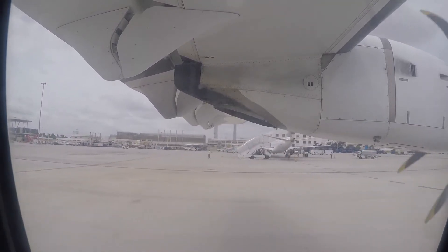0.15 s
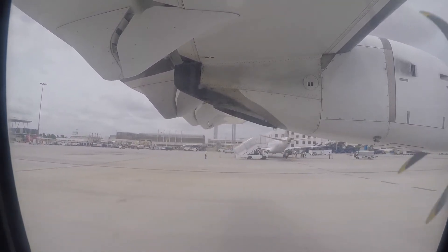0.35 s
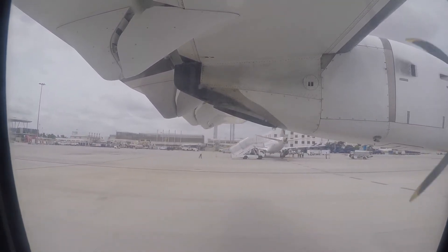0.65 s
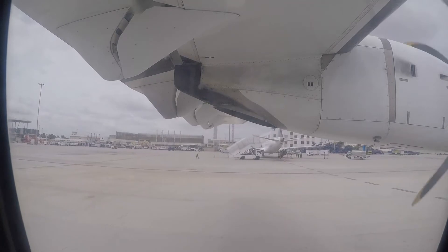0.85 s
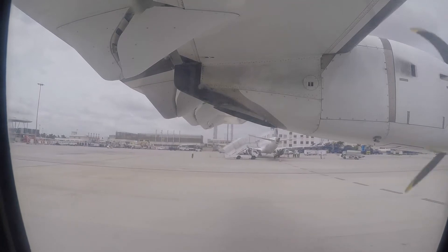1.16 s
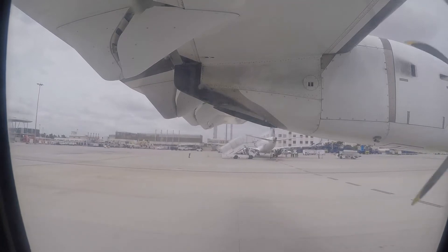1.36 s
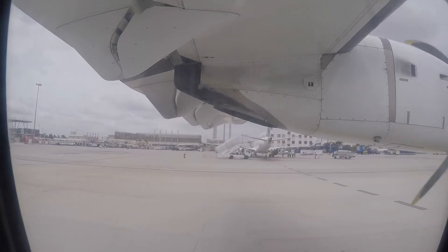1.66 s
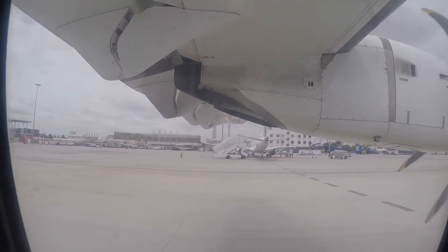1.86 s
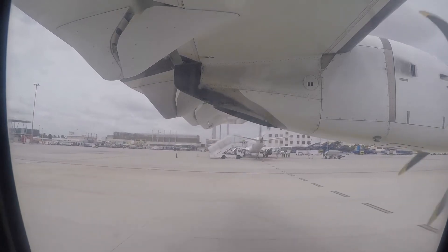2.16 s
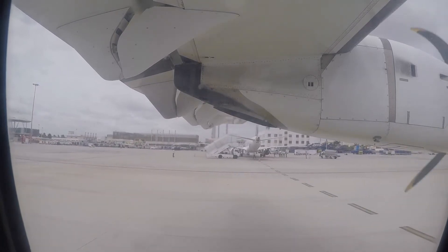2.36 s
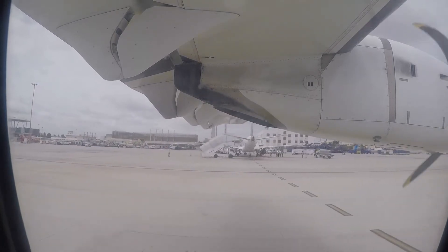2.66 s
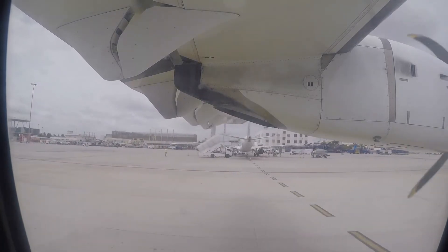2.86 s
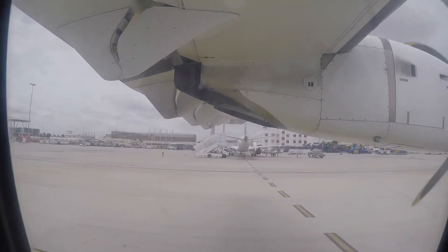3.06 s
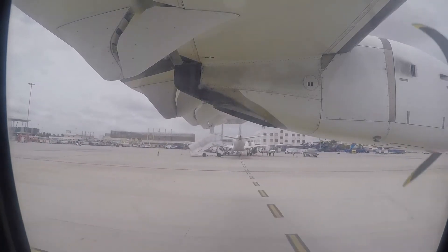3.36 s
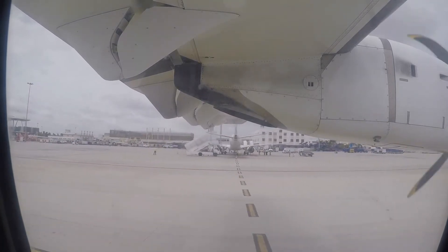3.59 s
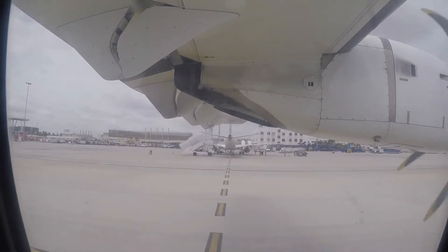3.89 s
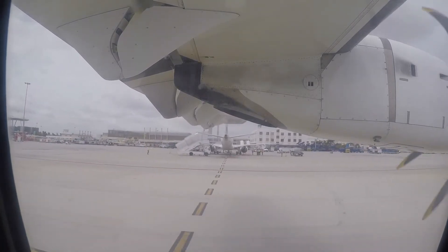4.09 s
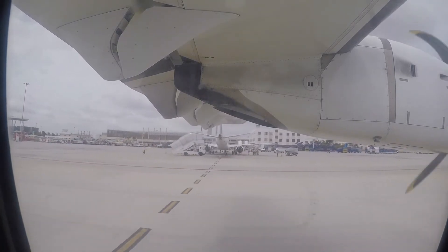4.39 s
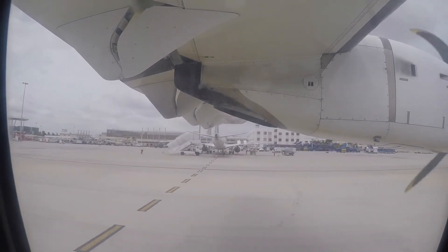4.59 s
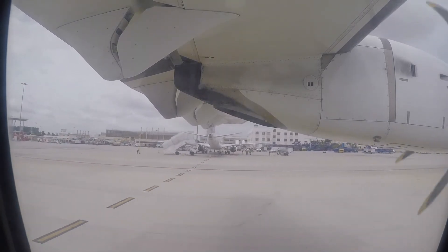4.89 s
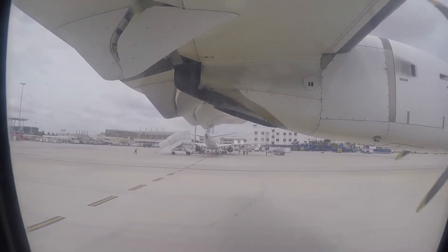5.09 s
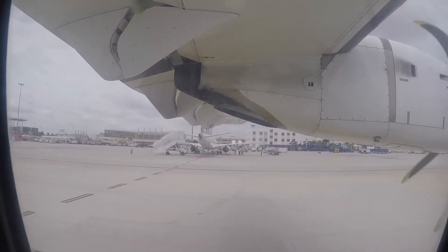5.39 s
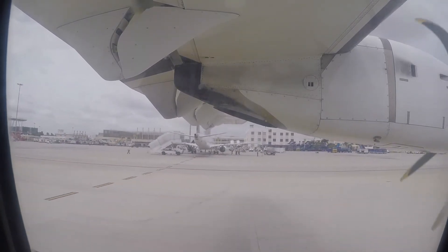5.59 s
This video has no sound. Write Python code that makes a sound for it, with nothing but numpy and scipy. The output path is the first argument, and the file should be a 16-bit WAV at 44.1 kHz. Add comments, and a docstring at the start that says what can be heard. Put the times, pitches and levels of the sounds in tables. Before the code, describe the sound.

A twin turboprop taxis across an apron, heard from a cabin seat beside one engine. A deep throbbing drone and churning propeller wash continue throughout, over rumbling wheels. The blades buzz for the first second, then a thin turbine whine sags slightly, comes forward and climbs back. A hollow cabin resonance swells on and off above soft hiss, and the rumble grows rougher with gentle bumps in the second half.

```python
"""The throbbing cabin drone of a taxiing twin turboprop, heard from a seat beside one engine.
The airframe shakes the cabin air into two deep notes, propeller wash drums on the fuselage and the
wheels rumble over uneven concrete. The blades buzz for the first second; then the turbine whine sags,
comes forward and climbs again. A cabin resonance howls in swells over engine hiss and a faint fan."""
import sys
import numpy as np
from scipy import signal
from scipy.fft import rfft, irfft
from scipy.io import wavfile
from scipy.ndimage import uniform_filter1d

SR = 44100
rng = np.random.default_rng(int(sys.argv[2]) if len(sys.argv) > 2 else 0)


def generate_wav(signal):
    """Clip the signal to [-1, 1] and save it as 16-bit WAV at the path in sys.argv[1]."""
    frames = np.transpose(np.atleast_2d(signal))
    scaled = np.clip(frames, -1, 1) * 32767
    pcm = np.round(scaled).astype(np.int16)
    wavfile.write(sys.argv[1], SR, pcm)


N = 253134
TIME = np.arange(N) / SR
FREQS = np.fft.rfftfreq(N, 1 / SR)


def drone(note_trim_db=-1, boom_trim_db=-2, boom_hz=57.15):
    """The airframe shakes the cabin air into two deep notes: one swells and dips, the lower one booms."""
    # upper note, sharpening a little in the second half: time_s, pitch_hz
    note_pitch = [(0, 126.6), (1.3, 125.4), (2.9, 126.9), (3.9, 129.2), (5.74, 130.5)]
    # its broad swells and narrow dips, slowly weakening: time_s, level_db
    note_envelope = [(0, -10.5), (.11, -11), (.21, -19.5), (.31, -14), (.38, -29), (.47, -12.5), (.58, -11),
                     (.73, -13), (.83, -24), (.96, -12), (1.19, -18.5), (1.3, -13.5), (1.56, -12.5),
                     (1.64, -16), (1.71, -40), (1.83, -12.5), (1.94, -22.5), (2.04, -15.5), (2.16, -11),
                     (2.29, -28), (2.38, -13), (2.45, -18), (2.58, -10.5), (2.66, -22), (2.75, -12),
                     (3.07, -13), (3.18, -18.5), (3.25, -16), (3.34, -41), (3.44, -16.5), (3.54, -34),
                     (3.62, -16.5), (3.8, -16.5), (3.89, -14.5), (4.04, -15.5), (4.12, -34), (4.3, -13),
                     (4.41, -35.5), (4.53, -16), (4.61, -30), (4.71, -15.5), (4.84, -26), (5.02, -21.5),
                     (5.121, -15), (5.26, -28), (5.33, -18), (5.46, -17.5), (5.58, -33.5), (5.74, -21)]
    hz, = follow(note_pitch)
    level, = follow([(s, gain_of(db)) for s, db in note_envelope])
    note = gain_of(note_trim_db) * level * tone(hz, rough=0.03, flutter_hz=6.3)
    _, shaking = ride()
    throb = unit_rms(1 + 0.14 * drift(rate_hz=12))
    boom = gain_of(boom_trim_db) * shaking * throb * tone(boom_hz, rough=0.08, flutter_hz=8)
    return note + boom


def wash(trim_db=5.5):
    """Churned air from the blades drums on the fuselage and rings the cabin."""
    # strength of the propeller wash: time_s, level_db
    thrust = [(0, -24.5), (1.2, -24), (2, -25.5), (2.85, -24.5), (3.35, -24.5), (4.5, -26.3), (4.87, -28),
              (5.15, -26), (5.74, -24.5)]
    # its bass-heavy colour: frequency_hz, relative_db
    spectrum = [(55, -19.5), (80, -2.5), (100, 2), (128, 0), (160, -4.5), (190, -9.5), (268, -13.5),
                (290, -9.5), (395, -13), (450, -15), (480, -22.5), (560, -26.5), (660, -28.5), (800, -35.5),
                (1200, -44.5), (2500, -65)]
    # cabin resonances: centre_hz, width_hz, level_db
    cabin_modes = [(140, 21, -39), (243.6, 12, -42), (300.2, 35, -38), (440, 99, -44.5)]
    db, = follow(thrust)
    churn = gain_of(db + trim_db) * steadied(coloured(spectrum), seconds=0.3)
    return churn + ringing(cabin_modes)


def wheels(trim_db=3.5):
    """Tyres on concrete rumble through the landing gear."""
    # sub-bass colour of the rumble: frequency_hz, relative_db
    spectrum = [(6, -48), (16, -27.5), (23, -2.5), (30, -10), (42, 2), (50, 3.5), (57, -12), (66, -2.5),
                (78, -9.5), (110, -25.5), (200, -59)]
    rumble, _ = ride()
    return gain_of(trim_db) * rumble * steadied(coloured(spectrum), seconds=0.098)


def ride():
    """Envelopes of the wheel rumble and the boom: steady rolling plus a smooth swell at each bump."""
    # the ride, growing rougher as the aircraft turns: time_s, rumble_db, boom_db
    rolling = [(0, -25, -21.5), (1.2, -25.5, -22.5), (2.3, -26, -24), (2.9, -24.5, -24), (3.6, -23, -22.5),
               (4.7, -24.5, -19.5), (5.2, -25.5, -13.5), (5.74, -20.5, -19.5)]
    # uneven patches of apron: middle_s, half_length_s, rumble_db, boom_db
    bumps = [(.38, 0.058, -21.5, -33), (1.79, 0.057, -37, -12), (3.15, 0.1, -18, -25),
             (3.604, 0.06, -15, -20), (3.892, 0.066, -21.5, -24), (4.14, 0.08, -36, -11),
             (4.504, 0.08, -17.5, -22), (4.682, 0.043, -22.5, -8.5), (5.27, 0.071, -37, -11)]
    rolling_power = gain_of(follow(rolling)) ** 2
    bump_power = sum(gain_of([[rumble_db], [boom_db]]) ** 2 * swell(s, half_s) ** 2
                     for s, half_s, rumble_db, boom_db in bumps)
    return np.sqrt(rolling_power + bump_power)


def propellers(far_db=-12, detune_hz=0.6, rough_per_order=0.03):
    """Two propellers, slightly out of step, beat against each other; higher harmonics are rougher."""
    # the buzz, strong and clean at first: time_s, blade_pass_hz, level_db, roughness
    buzz = [(0, 83.5, -25, .18), (.3, 83.6, -22.5, .18), (.45, 83.2, -31, .35), (.53, 83, -25.5, .25),
            (.68, 83.1, -26.5, .25), (1, 84, -37.5, 0.5), (1.8, 84.5, -52.5, 0.9), (2.9, 85.8, -39, 0.6),
            (3.2, 86, -45.5, .8), (5.25, 86, -47, 0.7), (5.74, 85, -34, 0.5)]
    # blade harmonics as heard through the fuselage: order, relative_db
    harmonics = [(1, -23), (2, -17), (3, -14.5), (4, -7.5), (5, -0.5), (6, -13.5), (7, -18), (8, -31),
                 (9, -25), (10, -26.5)]
    hz, db, rough = follow(buzz)

    def blades(pass_hz):
        return sum(gain_of(order_db) * tone(order * pass_hz, rough + rough_per_order * order, 14)
                   for order, order_db in harmonics)

    near = blades(hz)
    far = gain_of(far_db) * blades(hz - detune_hz)
    return gain_of(db) * (near + far)


def howl(pitch_hz=425.6, trim_db=-4):
    """A cabin resonance near the fifth blade harmonic sings out in separate swells."""
    # swells of the howl: time_s, level_db
    envelope = [(0, -32), (.9, -35.5), (1.1, -28), (1.35, -48), (1.5, -34), (1.8, -49), (2.06, -47),
                (2.16, -24), (2.28, -41), (2.41, -33), (2.52, -38), (2.76, -28.5), (2.84, -37),
                (2.95, -25.5), (3.1, -29.5), (3.2, -41), (3.55, -44), (3.65, -30.5), (3.87, -27.5),
                (4.02, -47), (4.18, -29), (4.6, -28), (4.78, -47), (4.9, -30), (5.1, -29), (5.25, -46),
                (5.5, -32), (5.62, -25.5), (5.74, -36)]
    db, = follow(envelope)
    return gain_of(db + trim_db) * tone(pitch_hz, rough=0.59, flutter_hz=21)


def turbine(second_db=-14, third_trim_db=0.2, flare_half_s=0.042, flare_floor_db=-66.5):
    """The whine: four harmonics of the shaft tone glide together, each fluttering on its own."""
    # shaft tone, sagging and recovering with turbine speed: time_s, pitch_hz
    shaft_pitch = [(0, 1031.7), (.65, 1030.5), (.95, 1025), (1.2, 1017), (1.55, 1011), (1.8, 1009),
                   (2.2, 1011.5), (2.6, 1016.5), (3, 1022), (3.4, 1028), (3.8, 1032), (4.2, 1034),
                   (5.74, 1035)]
    # fundamental, shadowed by the second harmonic: time_s, level_db
    first_envelope = [(0, -55.5), (.8, -53), (1.18, -61), (1.32, -42), (1.52, -53), (1.64, -43.5),
                      (1.95, -50), (2.2, -46.5), (2.52, -47.5), (2.63, -57), (2.78, -49.5), (2.94, -46),
                      (3.12, -57.5), (3.55, -51), (3.97, -60), (4.33, -53.5), (4.45, -55), (4.62, -51.5),
                      (4.9, -59), (5.05, -52.5), (5.74, -63)]
    # third harmonic, coming forward while the speed sags and recovers: time_s, level_db
    third_envelope = [(0, -61.5), (.95, -53), (1.2, -48.5), (1.52, -48), (1.57, -58), (1.63, -48),
                      (1.71, -61), (1.79, -48), (2, -51.5), (2.15, -50), (2.21, -62), (2.3, -47),
                      (2.4, -47.5), (2.53, -55), (2.59, -43), (2.66, -45), (2.72, -55), (2.81, -41),
                      (2.89, -46.5), (2.98, -44.5), (3.08, -52.5), (3.5, -58), (3.85, -54.5), (4.9, -66.5),
                      (5.4, -55), (5.74, -56)]
    # short flares of the fourth harmonic: middle_s, level_db
    fourth_flares = [(1.1, -52.5), (1.23, -57), (1.31, -55.5), (1.39, -55.5), (1.49, -58), (1.6, -56),
                     (1.75, -57.5), (2.17, -55), (2.38, -51.5), (2.53, -53.5), (2.72, -51), (2.85, -53),
                     (2.96, -55.5), (3.08, -56)]
    # flutter depth of each harmonic, first to fourth: roughness
    roughness = [0.088, .2, 0.11, .4]
    hz, = follow(shaft_pitch)
    first_db, = follow(first_envelope)
    third_db, = follow(third_envelope)
    flares = sum(gain_of(db) * swell(s, flare_half_s) for s, db in fourth_flares)
    fourth = np.hypot(flares, gain_of(flare_floor_db))
    levels = [gain_of(first_db), gain_of(first_db + second_db), gain_of(third_db + third_trim_db), fourth]
    return sum(level * tone(order * hz, rough, flutter_hz=21.9)
               for order, (level, rough) in enumerate(zip(levels, roughness), 1))


def hiss(trim_db=9, flicker_db=0.55, crest_hz=2680, crest_width_hz=380, crest_db=-50):
    """Air rushes through the engine, dulled by the window; it crests once, with the whine."""
    # strength of the airflow: time_s, level_db
    airflow = [(0, -52), (.45, -54), (1.4, -53), (1.95, -54), (2.8, -51.4), (3.12, -51.5), (3.3, -53),
               (4.3, -53.5), (4.9, -55), (5.74, -54)]
    # colour of the hiss: frequency_hz, relative_db
    spectrum = [(500, -25), (900, 0), (1300, -3.5), (1650, -1), (1930, -5), (2500, 0), (3050, 0.5),
                (3480, -10), (4000, -6.5), (4950, -7.5), (5700, -15.5), (6800, -16), (8800, -24),
                (14300, -26.5), (16000, -42.5)]
    # fuzzy whistles within it, the lowest a faint whine of the far engine: centre_hz, width_hz, relative_db
    whistles = [(3062, 26, -19), (4010, 79, -20.5), (4340, 140, -19), (4880, 300, -16.5)]
    db, = follow(airflow)
    level = gain_of(db + trim_db + flicker_db * drift(rate_hz=23))
    rush = coloured(spectrum) + ringing(whistles)
    crest = swell(middle_s=2.92, half_s=0.25) * ringing([(crest_hz, crest_width_hz, crest_db)])
    return level * rush + crest


def flurries(centre_hz=600, width_hz=150):
    """The rush of the wash thickens for a moment, now and then."""
    # brief puffs of midrange noise: middle_s, level_db
    puffs = [(.52, -39), (.73, -44), (1.35, -44.5), (2.15, -44), (4.2, -44), (4.42, -43)]
    level = sum(gain_of(db) * swell(s, half_s=0.045) for s, db in puffs)
    return level * ringing([(centre_hz, width_hz, 0)])


def accessories(gear_hz=1680):
    """A cabin fan holds its pitch; a fuzzy gear tone fades away."""
    # thin tones of the fan: pitch_hz, level_db
    fan_tones = [(2875, -50), (3833, -68.5), (4797, -72)]
    # gear tone, fading halfway through: time_s, level_db
    gear_envelope = [(0, -60), (2.9, -59), (3.5, -75)]
    fan = sum(gain_of(db) * tone(hz, rough=0.038, flutter_hz=3.6) for hz, db in fan_tones)
    gear_db, = follow(gear_envelope)
    return fan + gain_of(gear_db) * tone(gear_hz, rough=0.3, flutter_hz=9.2)


def tone(hz, rough, flutter_hz):
    """A sine of rms 1 that turbulence shakes in level and phase."""
    cycles = np.cumsum(hz * np.ones(N)) / SR + rng.random()
    flutter = drift(flutter_hz) + 1j * drift(flutter_hz)
    shaken = np.exp(2j * np.pi * cycles) * (1 + rough * flutter)
    return unit_rms(shaken.real)


def noise(magnitude):
    """Noise of rms 1, shaped by a weight at each frequency."""
    return unit_rms(irfft(rfft(rng.standard_normal(N)) * magnitude, N))


def coloured(points):
    """Noise whose spectrum joins the points on a log-frequency axis."""
    hz, db = np.transpose(points)
    return noise(gain_of(np.interp(np.log(FREQS + 1), np.log(hz), db, right=-np.inf)))


def ringing(modes):
    """Noise in a set of resonances."""
    return sum(gain_of(db) * noise(1 / (1 + (2 * (FREQS - hz) / width) ** 2)) for hz, width, db in modes)


def drift(rate_hz):
    """A slow random wander of rms 1."""
    return noise(1 / (1 + (FREQS / rate_hz) ** 4))


def steadied(x, seconds):
    """Evens out the slow swells of a noise, leaving its quick flutter."""
    power = uniform_filter1d(x ** 2, int(seconds * SR))
    return x / np.sqrt(abs(power) + 1e-9)


def swell(middle_s, half_s):
    """A smooth rise and fall of height 1."""
    return np.exp(-((TIME - middle_s) / half_s) ** 2)


def follow(rows):
    """Turns breakpoints, time first, into one curve for each further column."""
    times, *columns = np.transpose(rows)
    return [np.interp(TIME, times, column) for column in columns]


def gain_of(db):
    """Decibels to amplitude."""
    return 10 ** (np.asarray(db) / 20)


def unit_rms(x):
    """Scales to an rms of 1."""
    return x / np.sqrt(np.mean(x ** 2) + 1e-20)


def scene():
    """Everything meets at the seat, in mono."""
    body = drone() + propellers() + howl() + wash() + flurries() + wheels()
    return (body + turbine() + accessories() + hiss())[None]


def record(dry, cutoff_hz=15250):
    """A click-free start and stop, with the very top of the treble cut away."""
    fade = signal.windows.tukey(N, .002)
    low_pass = signal.firwin(511, cutoff_hz, window=("kaiser", 9), fs=SR)
    return signal.oaconvolve(dry * fade, low_pass[None], "same")


dry = scene()
out = record(dry)
generate_wav(out)
```